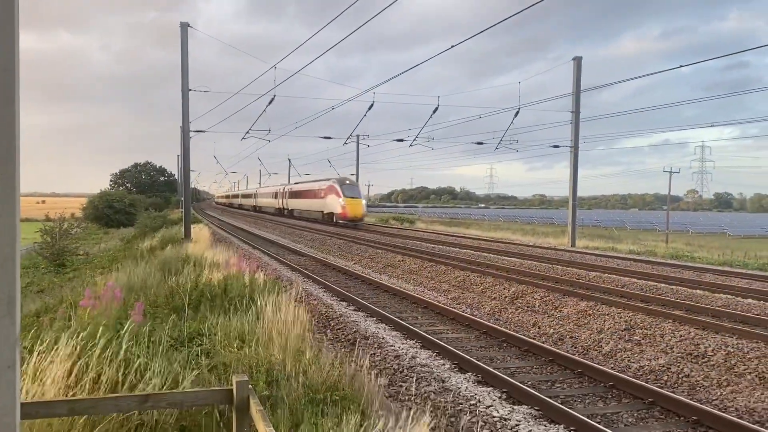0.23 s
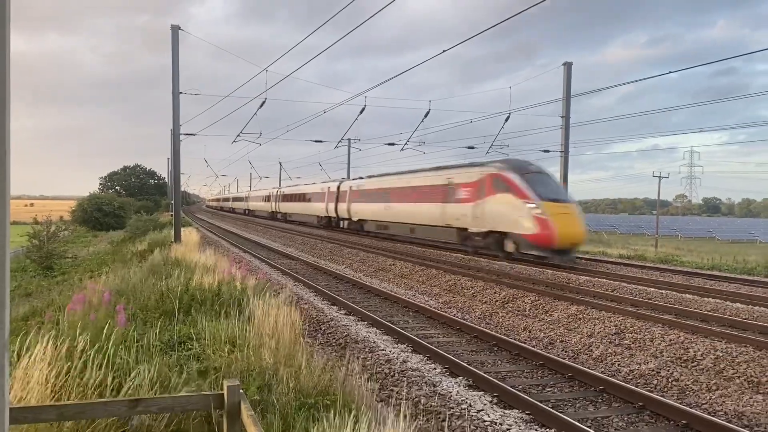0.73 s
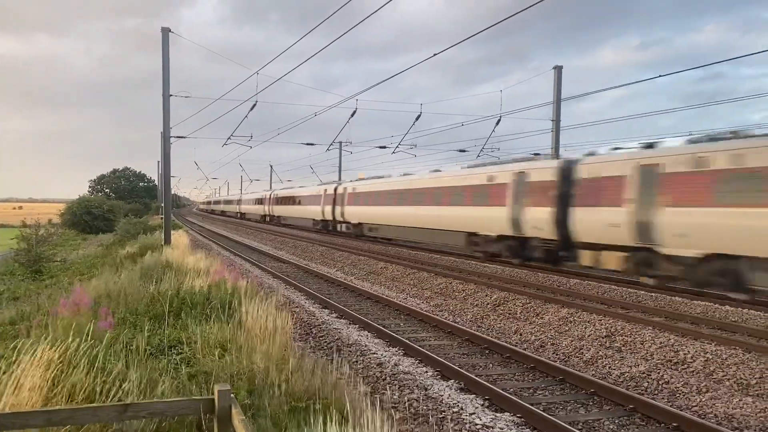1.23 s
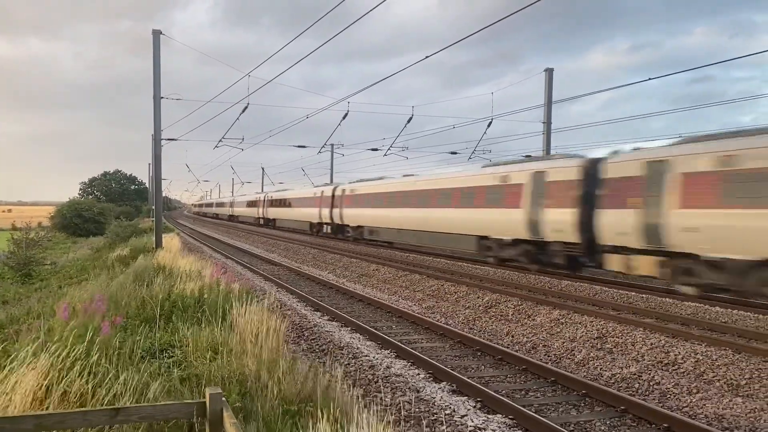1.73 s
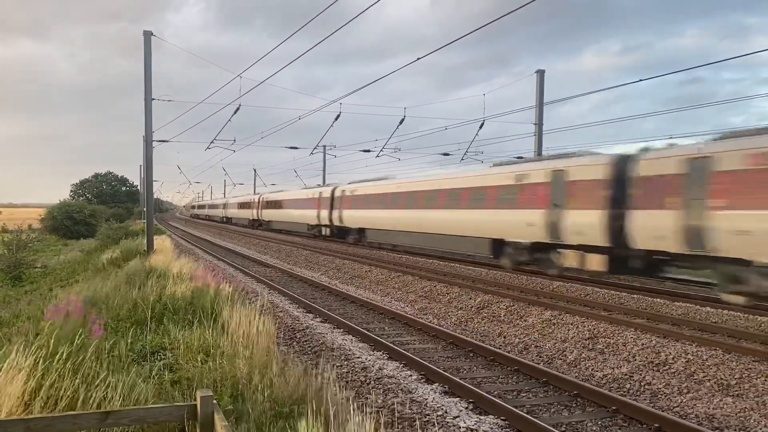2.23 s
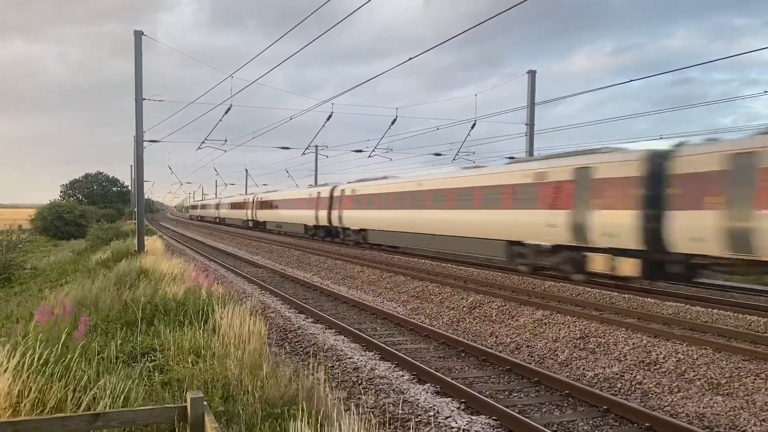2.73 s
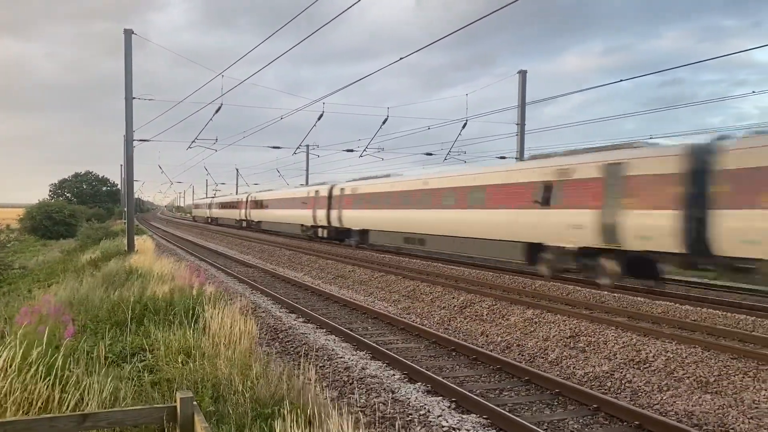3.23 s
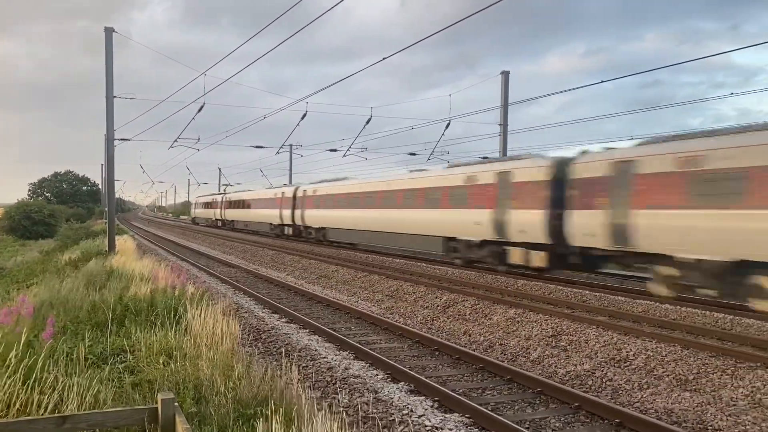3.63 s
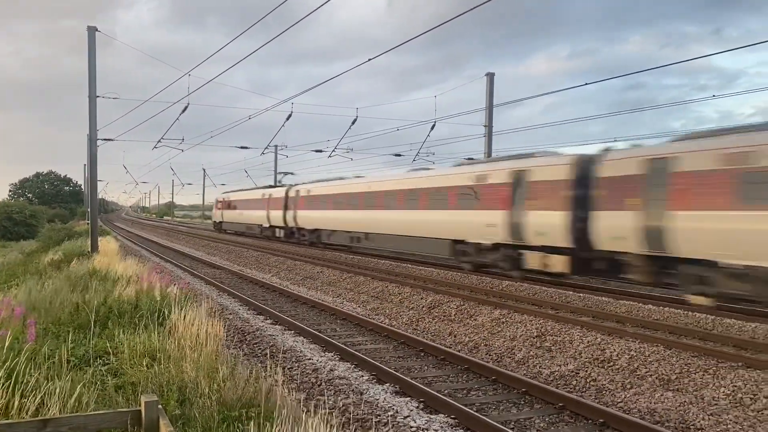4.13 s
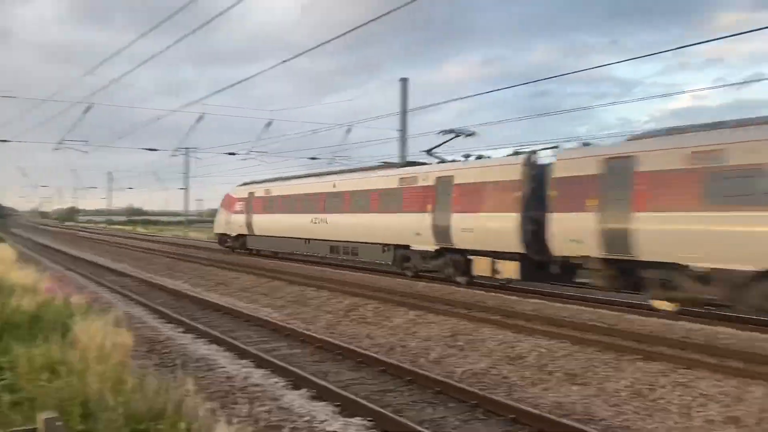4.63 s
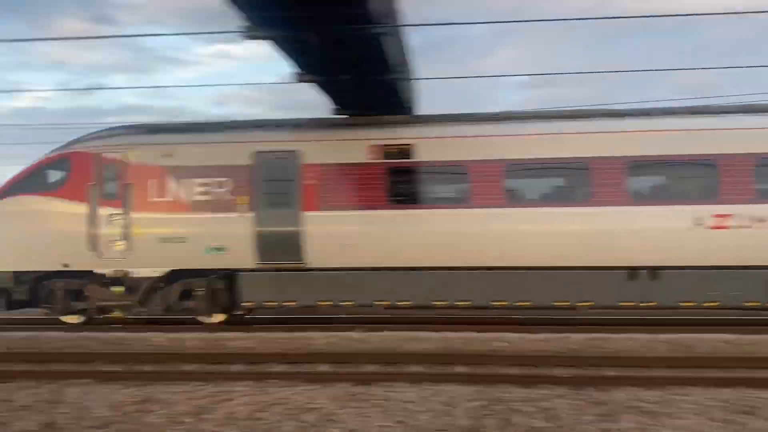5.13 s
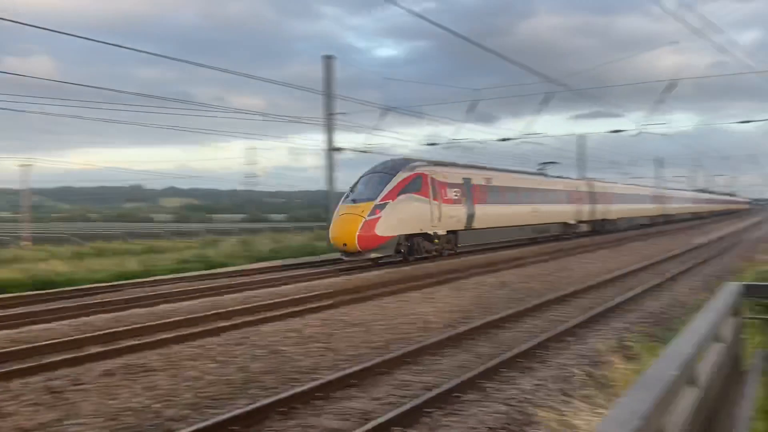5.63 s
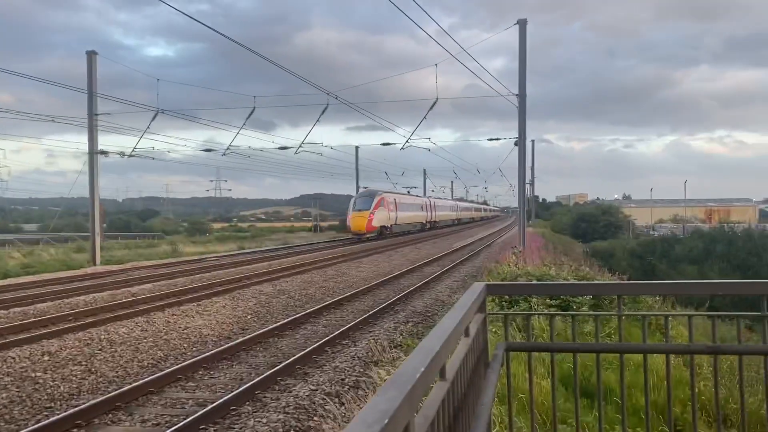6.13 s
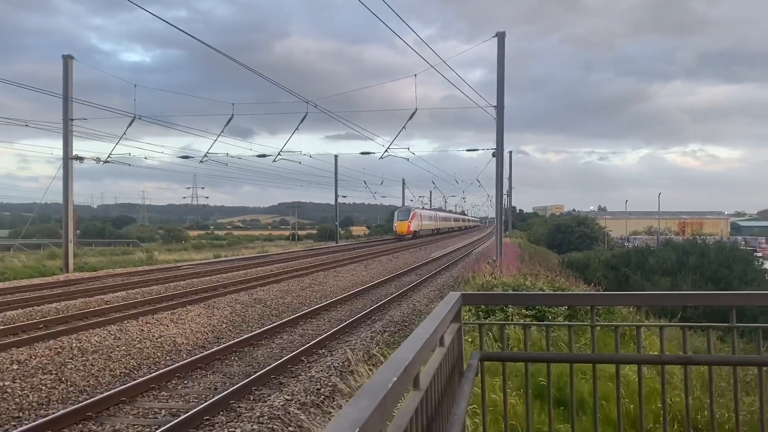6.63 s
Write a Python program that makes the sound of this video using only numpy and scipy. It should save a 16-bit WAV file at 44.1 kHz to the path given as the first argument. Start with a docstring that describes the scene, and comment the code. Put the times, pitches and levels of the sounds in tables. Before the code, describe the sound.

Wind buffets a trackside microphone as a high-speed train sweeps by, its wheel roar pulsing with each bogie, then fading into the distance.

```python
"""Fast electric train passing in gusty wind

A train rushes past a handheld camera beside the track: wheels and rail roar, air hisses along the coaches
and drones round the roof gear. These are shaped noises that swell as each bogie goes by, with fuzzy tones.
Wind rumbles, thumps and puffs on the microphone ports, made of noise bursts and low wavering tones.
One dull knock sounds near the end, and the sound drops out twice for an instant.
"""
import sys
import numpy as np
from scipy import signal
from scipy.fft import rfft, irfft, next_fast_len
from scipy.io import wavfile
from scipy.ndimage import uniform_filter1d, map_coordinates

SR = 44100
rng = np.random.default_rng(int(sys.argv[2]) if len(sys.argv) > 2 else 0)


def pcm_store(signal):
    """Save signal as 16-bit PCM."""
    levels = np.round(np.clip(np.atleast_2d(signal), -1, 1) * 32767)
    wavfile.write(sys.argv[1], SR, levels.astype(np.int16).T)


N = 303799


def amp(db):
    """Turn decibels into a gain."""
    return 10 ** (np.asarray(db) / 20)


def unit(x):
    """Scale a signal to rms 1."""
    return x / np.sqrt(np.mean(x ** 2) + 1e-20)


def pan(left_minus_right_db):
    """Gains of left and right, sharing the difference equally."""
    return amp(np.array([[.5], [-.5]]) * left_minus_right_db)


def along(points, hz):
    """Read a curve of (pitch, value) points on a log pitch axis."""
    f, v = np.transpose(points)
    return np.interp(np.log(hz + 1), np.log(f + 1), v)


def curves(rows):
    """One value per sample for each column after the time."""
    s, *columns = np.transpose(rows)
    return [np.interp(np.arange(N) / SR, s, column) for column in columns]


def wobble(rate):
    """A smooth random curve with rate knots a second."""
    knots = rng.standard_normal(int(N * rate / SR) + 4)
    return map_coordinates(knots, [np.arange(N) * rate / SR])


def filtered(x, response):
    """Pass x through a filter given as a function of frequency."""
    m = next_fast_len(x.shape[-1] + 8192)
    return irfft(rfft(x, m) * response(np.fft.rfftfreq(m, 1 / SR)), m)[..., :x.shape[-1]]


def spectrum(points):
    """Filter gain drawn through (pitch_hz, level_db) points."""
    return lambda hz: amp(along(points, hz))


def resonances(modes):
    """Filter gain of ringing modes (pitch_hz, width_hz, level_db) driven by noise; their powers add."""
    def gain(f):
        power = 1e-12
        for centre, width, db in modes:
            damping = (f * width) ** 2
            power = power + amp(2 * db) * damping ** 2 / ((centre ** 2 - f * f) ** 2 + damping) ** 2
        return np.sqrt(power)
    return gain


def rush(colour, patchy_db, shift=1, air_metres=0, size=1024):
    """A pair of coloured noises, rms 1; shift scales the pitch, air_metres dulls the treble."""
    n = np.size(shift) if np.ndim(shift) else N
    hz, t, z = signal.stft(rng.standard_normal((2, n)), SR, nperseg=size)
    # patches of random gain, smooth in pitch and time
    patches = uniform_filter1d(rng.standard_normal(z.shape[1:]), size=9, axis=0)
    patches = uniform_filter1d(patches, size=5, axis=1)
    framed = lambda v: np.interp(t, np.arange(n) / SR, v * np.ones(n))
    dulling_db = .1 * np.outer((hz / 10000) ** 2, framed(air_metres))
    gain = colour(hz[:, None] / framed(shift)) * amp(-dulling_db)
    gain = gain / np.linalg.norm(gain, axis=0)
    z = z * gain * amp(patchy_db * unit(patches))
    return unit(signal.istft(z, SR, nperseg=size)[1][:, :n])


def breathy(rows, width):
    """A fuzzy gliding tone: noise in one resonance, width as a share of its pitch."""
    db, pitch = curves(rows)
    out = np.zeros((2, N))
    on = slice(round(rows[0][0] * SR), round(rows[-1][0] * SR))
    tone = rush(resonances([(1, width, 0)]), patchy_db=1.7, shift=pitch[on], size=2048)
    out[:, on] = amp(db[on]) * tone
    return out


def swells(times, dbs, widths, steep=2):
    """Power of sounds that rise and fall about their moments."""
    t = np.arange(0, N, 64) / SR
    power = np.zeros(len(t))
    for s, db, width in np.broadcast(times, dbs, widths):
        power += amp(2 * db) / (1 + ((t - s) / width) ** 2) ** steep
    return np.interp(np.arange(N) / SR, t, power)


def level(base_db, power):
    """Gain of a base level with swells on top."""
    return np.sqrt(amp(2 * base_db) + power)


# how alike the two ports hear a sound: pitch_hz, likeness (0 to 1)
PORT_LIKENESS = [(100, 0.89), (350, 0.8), (700, 0.5), (2000, 0.26), (2700, 0.72), (3400, 0.31),
                 (3900, 0.76), (5400, 0.067), (7000, 0.66), (8600, 1), (16000, 1)]
# how far the left port lags: pitch_hz, lag_cycles
PORT_LAG = [(0, 0), (400, .05), (680, .38), (1100, .1), (1700, .47), (2300, .05), (3100, -.13), (3700, 0),
            (7000, 0), (15300, 2)]


def ports(pair):
    """Two unrelated noises become what the left and right ports receive: partly alike, one lagging."""
    m = next_fast_len(N + 8192)
    hz = np.fft.rfftfreq(m, 1 / SR)
    turn = np.arccos(np.clip(along(PORT_LIKENESS, hz), 0, 1)) / 2
    mid, side = rfft(pair, m) * [np.cos(turn), np.sin(turn)]
    half_lag = np.exp(1j * np.pi * np.interp(hz, *np.transpose(PORT_LAG)))
    return irfft([(mid + side) / half_lag, (mid - side) * half_lag], m)[:, :N]


# tone colour of the fields: pitch_hz, relative level_db (per Hz)
FIELD_COLOUR = [(300, -7), (1000, -12), (2500, -25), (5000, -15), (8000, -24), (15600, -23)]


def field_rustle():
    """The fields rustle faintly: quiet noise with patches of random gain."""
    return amp(-58) * rush(spectrum(FIELD_COLOUR), patchy_db=3)


# tone colour of the rumble: pitch_hz, relative level_db (per Hz)
RUMBLE_COLOUR = [(15, -52), (32, -10), (48, 5), (64, 4.5), (90, -1), (125, -5.5), (170, -11), (300, -109)]


def wind_rumble(rumble_db, lumps):
    """Wind pressing unevenly on the ports is deep noise whose level wanders."""
    return amp(rumble_db + 1.2 * lumps) * rush(spectrum(RUMBLE_COLOUR), patchy_db=0.0, size=4096)


# gusts on the ports: middle_s, rumble level_db, half_width_s (before a stretch of 1.17), thump pitch_hz
GUST_LIST = [(0.049, -22.5, 0.029, 89.3), (.175, -18, 0.015, 95.03), (.33, -14.5, 0.029, 100.2),
             (.387, -15.5, 0.032, 85.5), (.425, -14.5, 0.021, 96), (.458, -13, 0.01, 75.6),
             (.62, -19, 0.05, 79.4), (.92, -19.5, 0.024, 64.66), (1.01, -21, 0.026, 65.4),
             (1.36, -11.5, 0.034, 62), (1.54, -13, 0.074, 59.7), (1.85, -18.5, 0.069, 59.93),
             (2.16, -18, 0.04, 64.87), (2.32, -15, 0.025, 65.4), (2.6, -8.5, 0.016, 104.8),
             (2.68, -20, 0.015, 70.35), (2.734, -12, 0.0092, 70.17), (2.762, -7, 0.009, 75.05),
             (2.79, -5.5, 0.015, 106), (2.845, -9.5, 0.012, 99.4), (2.89, -12, 0.01, 99.56),
             (2.95, -12, 0.01, 105), (2.985, -11, 0.01, 94.6), (3.035, -16, 0.0093, 74.9),
             (3.12, -17, 0.017, 90.3), (3.3, -26, 0.12, 90), (3.62, -22.5, 0.052, 94.9),
             (3.82, -25, 0.039, 80.1), (4.17, -28, 0.035, 75.2), (4.64, -24, 0.021, 80),
             (4.8, -26, 0.025, 80), (5.05, -13.5, 0.016, 84.8), (5.13, -14.5, 0.025, 114.9),
             (5.39, -18.5, 0.016, 95.3), (5.7, -19, 0.045, 75.1), (5.755, -16.5, 0.011, 80),
             (5.93, -24, 0.013, 80), (6.015, -16, 0.016, 70), (6.06, -19, 0.023, 74.7),
             (6.11, -22, 0.018, 75), (6.45, -25, 0.05, 64.7), (6.545, -26, .016, 105)]


def gust_strength():
    """Each gust swells and fades about its moment; the thump's middle pitch glides between gusts."""
    times, gust_db, widths, middles = np.transpose(GUST_LIST)
    pitch, = curves(np.transpose([times, middles]))
    return swells(times, gust_db, 1.17 * widths, steep=2.84), pitch


# tone colour of a gust whose middle is 70 Hz: pitch_hz, relative level_db (per Hz)
THUMP_COLOUR = [(15, -52), (32, 8), (50, 12), (70, 8), (95, 3), (130, -17), (180, -12.5), (320, -53)]
PUSH_WANDER = .26  # how far the pitch of a gust's push strays, as a natural-log ratio


def gust_thumps(gusts, pitch):
    """A gust pushes the ports with a wavering low tone and its overtone, mixed with deep noise."""
    turn = 2 * np.pi * np.cumsum(pitch * np.exp(PUSH_WANDER * wobble(60))) / SR
    tone = np.sin(turn) + 0.26 * np.sin(2 * turn + 2 * wobble(20))
    push = tone * [[1], [.3]]  # shares of what the ports hear alike and oppositely
    noise = rush(spectrum(THUMP_COLOUR), patchy_db=0.5, shift=pitch / 70, size=2048)
    return np.sqrt(gusts) * unit(push + 0.85 * noise)


POPS_PER_S, POP_SPREAD_DB = 200, 3.0  # average rate, and random scatter in level


def pops():
    """Small eddies snap on the ports at random moments: filtered clicks, a pair of rms 1."""
    hits = rng.random((2, N)) < POPS_PER_S / SR
    hits = hits * amp(POP_SPREAD_DB * rng.standard_normal((2, N))) * rng.choice([-1, 1], (2, N))

    def snap(f):
        ring = 1j * f * 900 / (600 ** 2 - f * f + 1j * f * 900)
        return ring / (1 + 1j * f / 1900) ** 4
    return unit(filtered(hits, snap))


# tone colour of the buffeting: pitch_hz, relative level_db (per Hz)
BUFFET_COLOUR = [(60, -75), (110, 1.5), (170, 0), (300, -5.5), (600, -12.5), (1200, -23.5), (1900, -20),
                 (3000, -52.5)]
GUST_BUFFET_DB, POP_DB = -13, -5.5  # buffeting relative to a gust's rumble; pops relative to buffeting noise


def buffeting(buffet_db, gusts, lumps):
    """Turbulent wind shakes the ports: uneven noise plus the snaps of small eddies."""
    shaking = level(buffet_db, amp(2 * GUST_BUFFET_DB) * gusts)
    shaking = shaking * amp(1.93 * lumps + 2.1 * wobble(45))
    return shaking * (rush(spectrum(BUFFET_COLOUR), patchy_db=1.3) + amp(POP_DB) * pops())


# wind between gusts: time_s, rumble level_db, buffeting level_db, puffs' left_minus_right_db
WIND = [(0, -29, -20, 6), (.11, -28, -38, 4), (.3, -30, -26.5, 0), (.75, -29.5, -33.5, -6),
        (1.1, -26.5, -24.5, 0), (1.6, -20.5, -27, 0), (2.3, -21.5, -28, 0), (2.8, -18, -27, 4.5),
        (3.2, -24.5, -26.5, 10.5), (3.55, -30, -38.5, 5), (4.1, -35.5, -38.5, 3), (4.6, -38, -33, 1),
        (5.05, -26, -24, 2), (5.3, -26, -34, 3), (5.7, -25, -28.5, 13), (6.05, -21.5, -25, 0),
        (6.22, -24, -30.5, 2), (6.29, -30, -40, 4), (6.65, -30, -36, 9), (6.89, -32, -38, 3)]


def airflow():
    """Rumble and buffeting share the same slow lumps in the wind; gusts also raise the buffeting."""
    rumble_db, buffet_db, _ = curves(WIND)
    lumps = wobble(16)
    gusts, pitch = gust_strength()
    wind = wind_rumble(rumble_db, lumps) + gust_thumps(gusts, pitch) + buffeting(buffet_db, gusts, lumps)
    return ports(wind + field_rustle()) * pan(-1.8)


# wind puffs on the ports: start_s, level_db, length_s (4 ms at least), upper_edge_hz
PUFF_LIST = [(.002, -23, 0.026, 1120), (0.011, -20, 0.0069, 1970), (0.033, -22.5, 0.012, 1200),
             (0.152, -30, 0.013, 600), (0.167, -24.5, 0.023, 970), (.303, -13.5, 0.028, 870),
             (0.315, -19, 0.012, 1060), (0.328, -17.5, 0.03, 570), (0.68, -16.5, 0.016, 536),
             (2.593, -18, 0.025, 616), (2.719, -8.5, 0.01, 560), (2.748, -17, 0.0085, 1002),
             (2.77, -10, 0.026, 556), (2.821, -10, 0.03, 1260), (2.867, -15, 0.026, 610),
             (2.892, -9, 0.026, 540), (2.918, -18, 0.011, 660), (2.939, -19, 0.013, 660),
             (3.027, -16, 0.017, 474), (3.181, -17, 0.025, 570), (3.232, -14.5, 0.026, 599),
             (3.323, -14.5, 0.023, 1140), (3.42, -21.5, 0.013, 571), (3.581, -19.5, 0.012, 420),
             (3.613, -23, 0.02, 465), (3.832, -22, 0.032, 560), (5.023, -10.5, 0.016, 541),
             (5.038, -8, 0.019, 489), (5.103, -13.5, 0.016, 651.5), (5.125, -12, 0.014, 539),
             (5.345, -15.5, 0.013, 775), (5.481, -16.5, 0.0089, 930), (5.509, -17, 0.019, 611),
             (5.627, -20.5, 0.0096, 800), (5.668, -21.5, 0.01, 1087), (5.7, -19, 0.007, 1206),
             (5.735, -19.5, 0.017, 655), (5.777, -25, .01, 788), (5.883, -22, 0.0066, 1510),
             (5.907, -23, 0.012, 812), (5.965, -21, 0.01, 897), (5.984, -18, 0.025, 1040),
             (6.005, -20.5, 0.028, 1040), (6.04, -17.5, 0.034, 890), (6.169, -28, 0.014, 700),
             (6.344, -24.5, 0.011, 1055), (6.674, -25, 0.012, 559), (6.699, -26, 0.008, 750),
             (6.734, -31.5, 0.014, 564), (6.778, -24, 0.007, 600)]


def puffs():
    """Each eddy that breaks on the ports is a short ragged burst, only partly shared by both."""
    out = np.zeros((2, N + SR))
    t = np.arange(SR // 5) / SR
    side_db = curves(WIND)[-1]
    for s, db, length, edge in PUFF_LIST:
        start = round(s * SR)
        shared, left, right = rng.standard_normal((3, len(t)))
        # the bass is shared
        noise = shared + 1.3 * filtered(np.array([left, right]), lambda f: f / (f + 250))

        def band(f):
            body = f ** 2 / (f ** 2 + 130 ** 2) / np.sqrt(1 + f / 900)
            top = 1 / (1 + (f / edge) ** 4) + 0.016 / (1 + (f / edge / 2.4) ** 4)
            return body * top
        u = t / max(length, .004)
        shape = np.minimum(u / 0.38, 1) * np.exp(-u ** 3)
        burst = filtered(noise, band) * shape
        # it tears in spurts
        burst *= amp(0.38 * unit(uniform_filter1d(rng.standard_normal(len(t)), size=200)))
        burst *= np.linalg.norm(shape) / np.linalg.norm(burst, axis=1, keepdims=True)
        out[:, start:start + len(t)] += amp(db) * pan(side_db[start]) * burst
    return out[:, :N]


KNOCK_S, KNOCK_DB, KNOCK_HZ, KNOCK_WIDTH_S = 6.7895, -14.5, 287, .0042  # middle, peak, pitch, width


def knock():
    """A short dull tone that swells and dies within a few cycles."""
    t = np.arange(N) / SR - KNOCK_S
    return amp(KNOCK_DB) * np.exp(-(t / KNOCK_WIDTH_S) ** 2) * np.cos(2 * np.pi * KNOCK_HZ * t)


# a faint whistle from the last bogie: time_s, level_db, pitch_hz
WHISTLE_GLIDE = [(5.08, -70, 3330), (5.2, -44, 3270), (5.33, -39, 3170), (5.47, -44, 3070),
                 (5.62, -65, 3000)]


def bogie_whistle():
    """A narrow band of noise whistles faintly and falls in pitch."""
    return breathy(WHISTLE_GLIDE, width=.018)


# a thin whine from one wheel: time_s, level_db, pitch_hz
WHINE_GLIDE = [(1.7, -65, 4200), (1.82, -37, 4200), (1.92, -34, 4200), (2.01, -32, 4050), (2.09, -36, 3800),
               (2.18, -65, 3650)]


def wheel_whine():
    """One wheel whines thinly: a narrow band of noise that holds its pitch, then sinks."""
    return breathy(WHINE_GLIDE, width=.06)


# the rush of the last bogie: time_s, level_db, pitch_hz
WHOOSH_GLIDE = [(5.05, -62, 2000), (5.17, -29, 1655), (5.28, -35, 1407), (5.42, -53, 1200),
                (5.6, -65, 1100)]


def bogie_whoosh():
    """The rush of the last bogie drops in pitch as it leaves."""
    return breathy(WHOOSH_GLIDE, width=.2)


# the rail singing under the leading coach: time_s, level_db, pitch_hz
SING_GLIDE = [(.7, -53, 1193), (.78, -27, 1167), (.87, -20.5, 1115), (.91, -39, 1120), (1.0, -22, 1160),
              (1.1, -47, 1110), (1.25, -60, 1080)]


def rail_song():
    """The rail sings under the leading coach: noise ringing in one resonance."""
    return breathy(SING_GLIDE, width=.12)


# the rear pantograph's hoot: time_s, level_db, pitch_hz
HOOT_GLIDE = [(4.05, -57, 345), (4.22, -32.5, 325), (4.36, -30, 270), (4.52, -24.5, 213), (4.8, -24, 236),
              (4.98, -40, 200), (5.15, -92, 190)]


def pantograph_hoot():
    """The rear pantograph hoots as it comes: a very wide resonance makes a breathy tone."""
    return breathy(HOOT_GLIDE, width=.7)


# vortices shed by the roof gear: time_s, level_db, drone's middle pitch_hz
ROOF_VORTICES = [(0, -32, 220), (.16, -47, 200), (.27, -25.5, 234), (.9, -23, 267), (1.08, -16, 259),
                 (1.55, -20.5, 223), (2.3, -23, 227), (2.9, -22.5, 223), (3.3, -29.5, 261.8),
                 (3.45, -32, 242), (4.2, -35, 253.1), (4.6, -29, 227.8), (4.98, -24, 265), (5.16, -40, 215),
                 (5.45, -29, 230.6), (6.02, -42.5, 224), (6.26, -51, 186.7), (6.89, -38, 217)]
# tone colour of a drone whose middle is 250 Hz: pitch_hz, relative level_db (per Hz)
DRONE_COLOUR = [(80, -55), (160, 0.5), (250, 1), (400, -3), (540, -5.5), (610, -22.5), (1500, -74)]


def roof_drone():
    """Vortices shed round the roof gear drone: low noise whose pitch glides and level wavers."""
    drone_db, pitch = curves(ROOF_VORTICES)
    loudness = amp(drone_db + 1.4 * wobble(18) + 1.6 * wobble(40))
    return loudness * rush(spectrum(DRONE_COLOUR), patchy_db=0.0, shift=pitch / 250, size=2048)


# tone colour of the air before pitch factor and dulling: pitch_hz, relative level_db (per Hz)
AIR_COLOUR = [(900, -25), (2500, 1.5), (4500, -1), (5700, -1), (7000, -4), (8500, -11), (12000, -10.5),
              (14000, -13.5), (15600, -16.5)]
NOSE_S, NOSE_DB, NOSE_WIDTH_S = 0.748, -22.5, 0.067  # middle, level, half width


def air_hiss(air_db, bogie_power, pitch_factor, air_metres):
    """Turbulence hisses along the body, its pitch and treble changing; the nose shoves the air aside."""
    shove = bogie_power + swells(NOSE_S, NOSE_DB, NOSE_WIDTH_S)
    hiss = rush(spectrum(AIR_COLOUR), patchy_db=2.0, shift=pitch_factor, air_metres=air_metres)
    return level(air_db, shove) * hiss


# rail resonances when their middle is 1000 Hz: pitch_hz, width_hz, relative level_db
RAIL_MODES = [(740, 430, -2.5), (977, 710, 1), (1200, 740, -2)]


def rail_hum(rail_db, bogie_power, middle_hz):
    """Rough steel shakes the rail, which hums in broad resonances whose pitch glides."""
    return level(rail_db, bogie_power) * rush(resonances(RAIL_MODES), patchy_db=1.0, shift=middle_hz / 1000)


# ringing wheels before the pitch factor: pitch_hz, width_hz, relative level_db
WHEEL_MODES = [(1970, 1240, 1), (2310, 140, -4.5), (2545, 190, 0.5), (2875, 92, 0), (3210, 360, -7),
               (3940, 560, -9.5)]


def wheel_roar(wheels_db, bogie_power, pitch_factor):
    """Rough steel on steel shakes the wheels, which ring at a gliding pitch."""
    return level(wheels_db, bogie_power) * rush(resonances(WHEEL_MODES), patchy_db=1.5, shift=pitch_factor)


# the train between bogies: time_s, wheels level_db, air level_db, rail level_db
TRAIN_BODY = [(0, -54, -59, -32), (.1, -51, -51.5, -49), (.35, -42, -43.5, -43), (.6, -44, -32.5, -29),
              (.9, -32, -34, -24), (1.2, -27.5, -28.5, -26), (1.9, -25.5, -29.5, -28),
              (2.2, -28.5, -31, -28), (3.1, -29.5, -33, -29.5), (3.6, -28.5, -33.5, -28.5),
              (4.55, -29.5, -32.5, -31), (5.1, -29, -31, -24.5), (5.45, -35, -37, -29),
              (6.15, -44.5, -44, -34), (6.3, -44, -44, -36), (6.89, -52, -49.5, -41)]
# bogies going by: middle_s, wheels level_db, air level_db, rail level_db
BOGIE_LIST = [(.83, -22, -26, -35), (.97, -25.5, -34, -22.5), (1.04, -19.5, -22.5, -20),
              (1.5, -28, -38, -38), (2.04, -31, -30.5, -29.5), (2.3, -31, -32, -27.5),
              (2.5, -26.5, -30, -22), (2.95, -44, -40, -30), (3.31, -28, -35.5, -29),
              (3.89, -37, -34.5, -50), (4.38, -35, -33, -44), (4.71, -28.5, -32.5, -24),
              (4.9, -32, -35, -26), (5.26, -50, -52, -26)]
# time_s, treble dulling of the hiss (as metres of air), pitch_factor of wheels and air,
# rail hum's middle pitch_hz
TREBLE_AND_PITCH = [(0, 9.2, 1, 970), (.7, 52, 0.87, 1130), (1.08, 19, 0.98, 1051), (1.4, 10.1, 0.98, 1080),
                    (2.5, 10, 1, 920), (2.9, 9.9, 0.98, 840), (4.7, 5.8, 0.99, 904), (5.15, 5.6, 1.0, 870),
                    (5.4, 11.4, 0.94, 780), (5.8, 22, 0.94, 800), (6.2, 36, 0.95, 777),
                    (6.89, 47, 0.92, 847)]
BOGIE_S, RAIL_LINGERS = 0.08, 1.32  # half width of a swell; the rail's is this many times wider
TRAIN_PAN_DB, DRONE_PAN_DB = 0.2, -2  # left minus right


def train():
    """Wheels, rail and air swell with each bogie; roof drone and fuzzy tones join, all flickering together."""
    wheels_db, air_db, rail_db = curves(TRAIN_BODY)
    air_metres, pitch_factor, rail_pitch = curves(TREBLE_AND_PITCH)
    times, bogie_db, bogie_air_db, bogie_rail_db = np.transpose(BOGIE_LIST)
    wheels = wheel_roar(wheels_db, swells(times, bogie_db, BOGIE_S), pitch_factor)
    air = air_hiss(air_db, swells(times, bogie_air_db, BOGIE_S), pitch_factor, air_metres)
    rail = rail_hum(rail_db, swells(times, bogie_rail_db, RAIL_LINGERS * BOGIE_S), rail_pitch)
    tones = pantograph_hoot() + bogie_whoosh() + bogie_whistle() + rail_song() + wheel_whine()
    body = pan(TRAIN_PAN_DB) * ports(wheels + air + rail)
    roof_and_tones = pan(DRONE_PAN_DB) * ports(roof_drone() + tones)
    flutter_db = 0.19 * wobble(32)  # eddies in the path make the whole roar flicker
    return amp(flutter_db) * (body + roof_and_tones)


def scene():
    """Wind, puffs and the knock together with the passing train."""
    return airflow() + puffs() + knock() + train()


# moments of silence: start_s, stop_s
SILENT_GAPS = [(.5096, .5300), (.5521, .5764)]
TOP_HZ = 15800  # nothing passes above this


def record(dry):
    """The microphones pass no deep bass; peaks round off, two short blocks are lost, the top is cut."""
    dry = filtered(dry, lambda hz: 1 / (1 + (38 / (hz + 1)) ** 4))
    rounded = dry / (1 + np.abs(dry / .95) ** 5) ** (1 / 5)
    kept = np.ones(N)
    for start, stop in SILENT_GAPS:
        kept[round(start * SR):round(stop * SR)] = 0
    kept = uniform_filter1d(kept, size=24)  # soften the edges of the gaps
    return filtered(rounded * kept, lambda hz: hz < TOP_HZ)


dry = scene()
out = record(dry)
pcm_store(out)
```